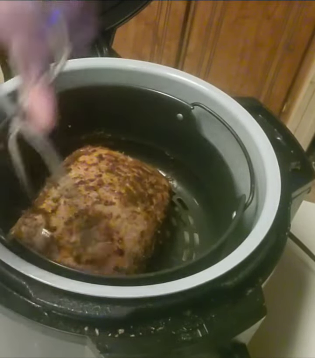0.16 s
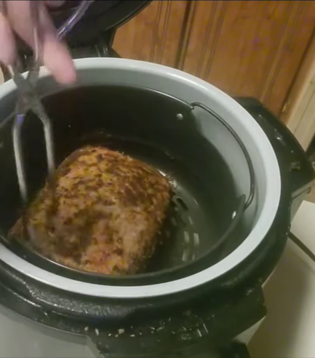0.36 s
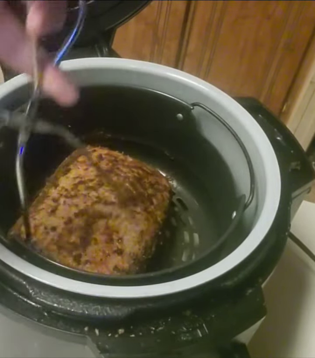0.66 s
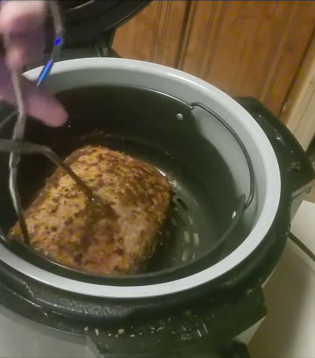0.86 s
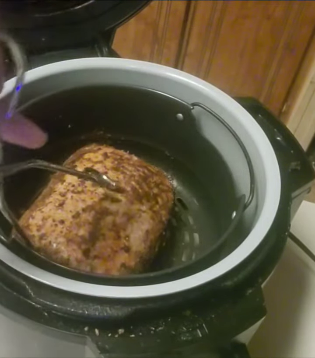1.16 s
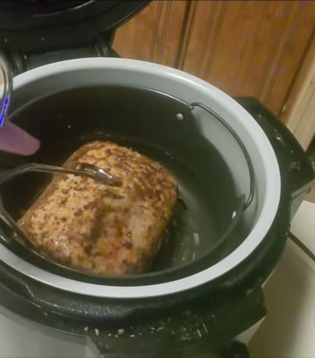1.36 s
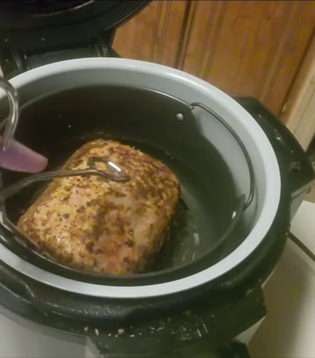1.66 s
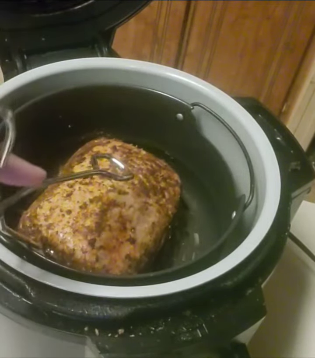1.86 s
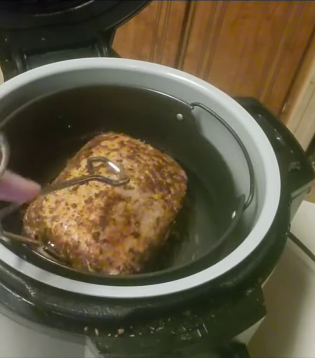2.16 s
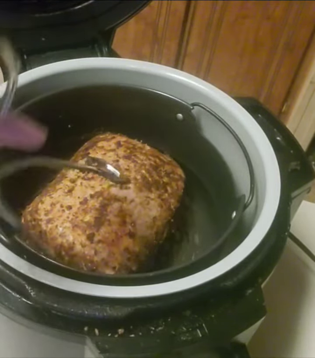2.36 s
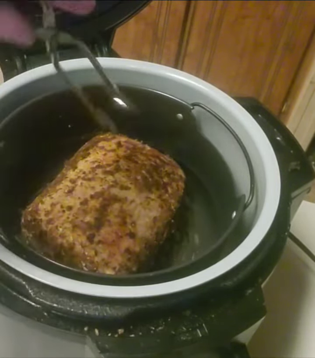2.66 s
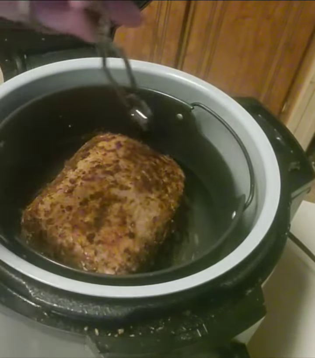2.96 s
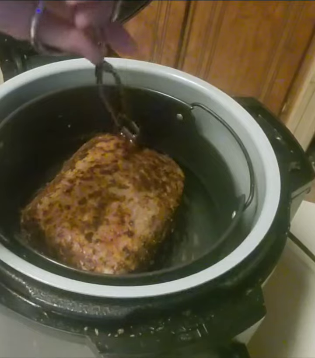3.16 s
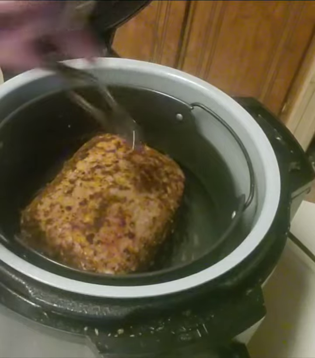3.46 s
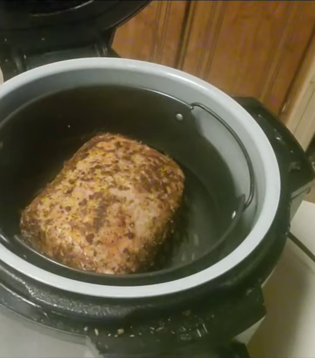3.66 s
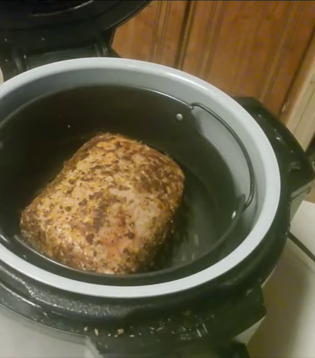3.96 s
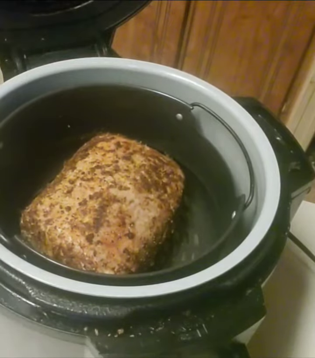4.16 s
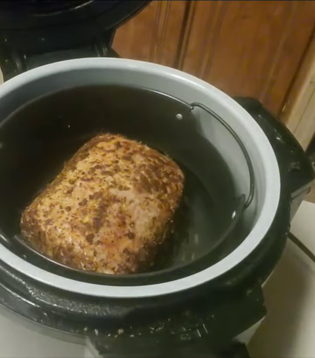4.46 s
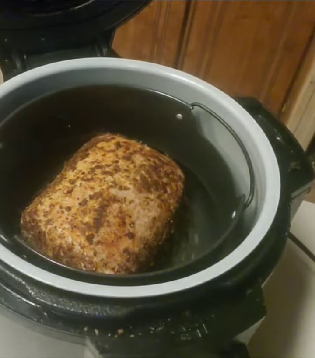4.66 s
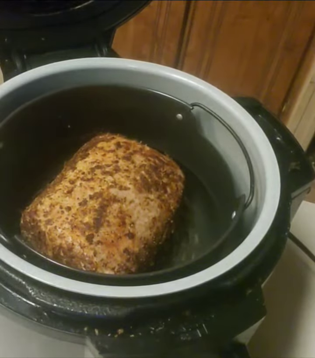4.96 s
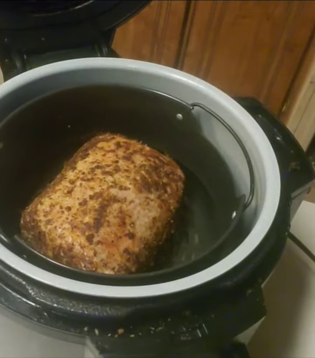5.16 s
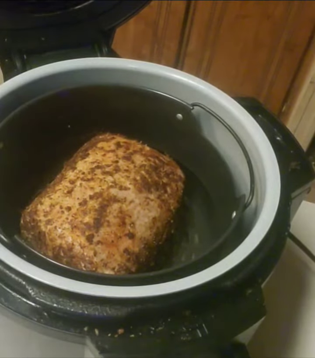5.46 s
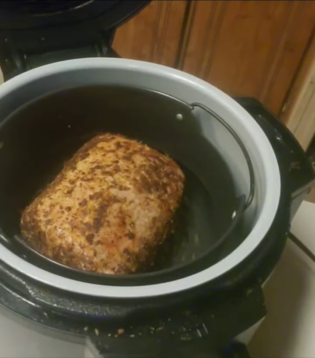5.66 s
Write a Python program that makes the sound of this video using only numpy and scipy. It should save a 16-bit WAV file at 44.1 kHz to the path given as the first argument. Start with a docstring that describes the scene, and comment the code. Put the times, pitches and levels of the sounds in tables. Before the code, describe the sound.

Over a steady fan hum, steel tongs clink against a metal basket, followed by a dull knock and a short, bright clatter.

```python
"""A faint scrape of steel over a humming fan, then bright clinks: tongs turn a roast in the metal
basket of a cooker, in a small kitchen. They clink one arm just after the other, make the basket boom
softly, scrape in trains of tiny slips and rub the moist crust. Later something knocks dully on the
counter and the tongs are put down, bouncing to rest in a short clatter."""
import sys
import numpy as np
from scipy import signal
from scipy.fft import rfft, irfft
from scipy.io import wavfile

SR = 44100
rng = np.random.default_rng(int(sys.argv[2]) if len(sys.argv) > 2 else 0)


def wav_out(sig):
    """Save sig, one row per channel (or a flat mono array), as 16-bit PCM at SR to the path in sys.argv[1]."""
    wavfile.write(sys.argv[1], SR, np.round(np.clip(np.atleast_2d(sig).T, -1, 1) * 32767).astype(np.int16))


N = 256662

# tongs hit the basket: t/s, level/dB, tilt/(dB/oct), arm 1 ping/Hz, arm 2 ping/Hz, ping mix/dB, boom/dB
BASKET_CLINKS = [(.076, -29.5, 1, 8900, 6100, -13, -30), (.508, -11.5, -4.5, 3150, 3830, -9, -18),
                 (.667, 3.5, -0.5, 6170, 3300, -8, -9.5), (.971, -29, -8, 5830, 1950, -11, -48),
                 (1.076, -26.5, -5, 6100, 3320, -11, -37), (1.1951, -14, -8.5, 2070, 3230, 1, -16.5),
                 (1.48, -37.5, -1.5, 1560, 1540, -3, -27), (2.6865, -4, 1.2, 4295, 3550, -5.5, -7),
                 (3.686, -43, 1.5, 14000, 14160, -15.5, -34)]
# tongs slide on the basket: start/s, end/s, level/dB, swell/dB, tilt/(dB/oct)
BASKET_SCRAPES = [(0.013, 0.136, -58, 3.5, -3.5), (.435, .512, -50.5, 24, -5), (0.505, .569, -39, -9, -5.5),
                  (0.569, .67, -52, 21, -5), (.965, 1.11, -61.5, 0, -4), (2.645, 2.691, -46.5, 5.5, -7)]
# crust, tongs and sleeve rub: start/s, end/s, level/dB, tilt/(dB/oct)
SOFT_RUBS = [(1.429, 1.801, -74, 1.5), (2.258, 2.41, -66.5, 3.5), (2.518, 2.65, -69.5, -6),
             (3.95, 4.424, -66.5, -2), (5.481, 5.884, -69.5, -5)]
# dull blows on the counter: t/s, level/dB, tilt/(dB/oct), ping/Hz, ping mix/dB
COUNTER_KNOCKS = [(4.4663, 3, 0, 627, -15), (4.4755, -10, 2.5, 990, -0.5), (4.632, -22.5, 1, 985, -7),
                  (4.862, -19.5, -5.5, 400, -10)]
# tongs touch the counter, then drop: t/s, level/dB, tilt/(dB/oct), arm 1 ping/Hz, arm 2 ping/Hz
TONG_LANDINGS = [(4.8732, -11.5, -3, 4000, 2400), (4.9731, 7, 1.44, 2700, 1775)]

# clear ring of each body (clatter is tongs on counter): f/Hz, level/dB, t60/s
TONG_RING = [(1358, -9, .22), (1556, -12, .18), (2015, -7, .18), (2116, -6, .18), (2387, -4, .2),
             (2780, -4, .16), (2993, -2, .17), (3165, -1, .12), (3330, -1, .16), (3605, 0, .15),
             (3965, -2, .16), (4258, -4, .19), (4366, -7, .14), (4883, -7, .12), (6153, -3, .24),
             (6480, -5, .16), (6560, -7, .16), (6652, -6, .13), (6930, -6, .15), (7555, -6, .16),
             (9017, -9, .12), (9508, -8, .13), (10450, -4, .1), (11480, -10, .15)]
BASKET_RING = [(121, -5, .45), (181, 1, .28), (259, -4, .2), (330, -5, .18), (368, -3, .2), (833, -10, .2),
               (912, -5, .26), (1404, -17, .22)]
COUNTER_RING = [(75, -6, .35), (121, 0, .45), (288, -1, .25), (345, -1, .11), (420, -4, .13), (645, 1, .11),
                (830, -9, .2), (997, 1, .19), (1086, -9, .22), (1309, -7, .17), (1404, -10, .16),
                (1964, -9, .13), (2390, -13, .15), (2750, -15, .15)]
CLATTER_RING = [(79, -4, .5), (118, -4, .45), (303, -10, .25), (425, -6, .25), (522, 2, .33),
                (764, -7, .22), (1023, -5, .33), (1058, -6, .22), (1172, -3, .25), (1273, -5, .22),
                (1646, 1, .25), (1740, 2, .25), (1786, 1, .28), (1830, -3, .22), (1992, -2, .25),
                (2110, -4, .25), (2167, -4, .25), (2531, -4, .22), (2716, -1, .23), (2758, -1, .24),
                (2938, -3, .2), (3052, -2, .23), (3374, -3, .23), (3720, -4, .24), (4198, -7, .23),
                (4775, -10, .23), (5885, -14, .15), (6190, -12, .2), (11322, -18, .24)]
# colour of each body's wash of short-lived modes, and of one rubbing grain: f/Hz, level/dB
TONG_EQ = [(60, -50.5), (200, -24.5), (700, -32.5), (1500, -15), (2600, -10.5), (3250, 3), (4200, -9),
           (5300, -11), (6700, -6), (8400, -11), (10400, -4.5), (12500, -12), (15500, -23)]
COUNTER_EQ = [(25, -32), (110, 0.5), (185, -6.5), (320, 4), (650, -1.5), (800, -1.5), (1000, -2.5),
              (2000, -11), (3200, -20), (5500, -35.5), (9000, -43.5), (16000, -40.5)]
CLATTER_EQ = [(25, -36.5), (70, -5), (190, -13.5), (480, -4.5), (700, -9.5), (1200, -2.5), (1750, -6.5),
              (2800, -1), (4000, -8.5), (5200, -15.5), (6300, -11), (7200, -26.5), (8700, -19),
              (10000, -26.5), (16000, -37)]
RUB_EQ = [(500, -13), (2000, 2.5), (4500, 3.5), (7500, -1), (10000, 0.5), (13000, -6), (16000, -11)]
# decay of each wash, and of the room: f/Hz, t60/s
TONG_DECAY = [(500, 0.054), (3300, 0.036), (7000, 0.04), (12000, .03)]
COUNTER_DECAY = [(100, 0.1), (500, 0.032), (2000, 0.061), (8000, 0.053)]
CLATTER_DECAY = [(100, 0.14), (500, 0.059), (2000, 0.033), (8000, 0.035)]
ROOM_DECAY = [(100, 0.57), (400, 0.17), (1500, 0.3), (4000, 0.3), (12000, 0.21)]

# colour of the fan's rushing air: f/Hz, level/dB
AIR_EQ = [(15, -42.5), (25, -15), (44, -9.5), (113, -5.5), (148, -4), (368, 1), (410, -5.5), (537, -11.5),
          (648, -10.5), (826, -15), (945, -11), (2850, -27.5), (3630, -28.5), (5010, -35), (15500, -44)]
# stereo image of that air: f/Hz, left-right correlation
AIR_CORRELATION = [(60, 0.47), (150, 1), (380, 0.69), (950, -0.23), (2380, 0.072), (5980, -0.1),
                   (15000, -0.22)]
# motor tones: f/Hz, level/dB before the fader
MOTOR_TONES = [(59, -71), (118.4, -66.5), (279.9, -64.5), (554.5, -65.5), (834.4, -67), (1147, -76),
               (1270, -84), (1427, -80.5), (1588, -83)]
# duct resonances: f/Hz, width/Hz, level/dB before the fader
DUCT_PEAKS = [(306, 35, -74), (378, 30, -81), (539, 40, -74.5), (790, 46, -66.5), (2380, 67, -81),
              (3570, 420, -77)]
# fader ride on the whole fan: t/s, level/dB
FAN_FADER = [(0, -3.5), (.45, -4.5), (.8, -0.5), (2.5, 0)]

EDGE_HZ = 15900
CLINK_LAG_S, LANDING_LAG_S = .0031, .0024  # the second arm trails the first


def tongs_in_basket():
    """The tongs clink and scrape; each clink also pushes the loaded basket, which booms softly."""
    struck = lambda: body(TONG_RING, TONG_EQ, TONG_DECAY, ring_db=-6, snap_db=-19)
    pressed = body(TONG_RING, TONG_EQ, TONG_DECAY, ring_db=-12, snap_db=-9.5)
    out = slide(BASKET_SCRAPES, pressed, slips_per_s=3500, uneven_db=2.5, fade=1 / 4)
    for s, *contact, boom_db in BASKET_CLINKS:
        out += strike(both_arms(s, *contact, CLINK_LAG_S), struck, ping_t60=0.055)
        add(out, s + CLINK_LAG_S, amp(boom_db) * ring(BASKET_RING, spread_hz=2400))
    return out * pan(-1.7)


def tongs_put_down():
    """The tongs touch the counter, drop and bounce in a short clatter."""
    landing = lambda: body(CLATTER_RING, CLATTER_EQ, CLATTER_DECAY, ring_db=-8.5, snap_db=-18.5)
    blows = []
    for contact in TONG_LANDINGS:
        blows += both_arms(*contact, ping_db=-5.5, lag_s=LANDING_LAG_S)
    drop_s, drop_db, drop_tilt, *_ = TONG_LANDINGS[-1]
    blows += hops(drop_s, drop_db, drop_tilt)
    return strike(blows, landing, ping_t60=0.024) * pan(-2.1)


def both_arms(s, db, tilt, first_hz, second_hz, ping_db, lag_s):
    """One contact of the tongs is a tight flam: a blow for each arm."""
    return [(s, db, tilt, first_hz, ping_db), (s + lag_s, db, tilt, second_hz, ping_db)]


def hops(s, db, tilt, hop_s=.0186, shrink=0.96, rebound_db=-9.5, loss_db=3.5, dulling=0.93):
    """Five bounces after the drop, each shorter, weaker and duller than the last."""
    blows = []
    for k, pings_hz in enumerate(rng.uniform(1700, 4000, (5, 2))):
        s += hop_s * shrink ** k
        hop_db = db + rebound_db - k * loss_db
        hop_tilt = tilt - (k + 1) * dulling
        blows += both_arms(s, hop_db, hop_tilt, *pings_hz, ping_db=-10.5, lag_s=LANDING_LAG_S)
    return blows


def counter_knocks():
    """Something knocks on the counter, which answers with a dull thud."""
    knock = lambda: body(COUNTER_RING, COUNTER_EQ, COUNTER_DECAY, ring_db=-8.5, snap_db=-7.5)
    return strike(COUNTER_KNOCKS, knock, ping_t60=0.036) * pan(-3)


def rubbing(swell_db=-2):
    """Soft friction on the crust: fine hissy grains with no ring, different left and right."""
    grain = click(RUB_EQ)[None]
    strokes = [(start, end, db, swell_db, tilt) for start, end, db, tilt in SOFT_RUBS]
    return np.array([slide(strokes, grain, slips_per_s=5000, uneven_db=1.8, fade=2 / 3)[side]
                     for side in range(2)])


def strike(blows, make_hit, ping_t60):
    """Each blow sounds the body afresh; the struck spot adds a short ping of its own."""
    out = np.zeros((2, N))
    for s, db, tilt, ping_hz, ping_db in blows:
        ping = amp(ping_db) * ring([(ping_hz, 0, ping_t60)], spread_hz=3400)
        add(out, s, amp(db) * unit(brighten(make_hit(), tilt) + ping))
    return out


def slide(strokes, response, slips_per_s, uneven_db, fade):
    """Friction: a dense train of tiny, uneven slips drives the body through each stroke."""
    out = np.zeros((2, N))
    for start, end, db, swell_db, tilt in strokes:
        sizes = rng.standard_normal(SR) * amp(uneven_db * rng.standard_normal(SR))
        slips = sizes * (rng.random(SR) < slips_per_s / SR)
        n = np.clip(round((end - start) * SR), 64, SR)
        swell = amp(np.linspace(0, swell_db, n))
        drive = unit_rms(slips[:n] * swell) * signal.windows.tukey(n, fade)
        add(out, start, amp(db) * signal.fftconvolve(drive[None], brighten(response, tilt), axes=1))
    return out


def body(modes, eq, decay, ring_db, snap_db):
    """One hit: a snap, a wash of short-lived modes, and the clear ring that outlasts them."""
    wash = unit(mono_bass(dying_noise(decay), below_hz=370))
    wash[:, 0] += amp(snap_db)
    attack = unit(signal.fftconvolve(wash, click(eq)[None], axes=1)[:, :SR // 2])
    return unit(attack + amp(ring_db) * ring(modes))


def ring(modes, spread_hz=1400):
    """Modes ring as dying sines; the higher ones reach left and right out of step."""
    t, out = np.arange(SR // 2) / SR, 0
    for hz, db, t60 in modes:
        phase = rng.uniform(-1, 1, (2, 1)) * min(hz / spread_hz, np.pi)
        rise = 1 - np.exp(-2 * hz * t)  # builds up within about one cycle
        envelope = rise * amp(-60 * t / t60)
        out = out + amp(db) * unit(envelope * np.sin(2 * np.pi * hz * t + phase))
    return unit(out)


def brighten(x, tilt):
    """Harder contact is brighter: a tilt in dB per octave above 500 Hz, at equal energy."""
    octaves = np.log2(EDGE_HZ / 500)
    tilt_filter = click([(500, 0), (EDGE_HZ, tilt * octaves)], size=512)
    tilted = signal.fftconvolve(x, tilt_filter[None], axes=1)[:, :x.shape[1]]
    return tilted * np.linalg.norm(x) / np.linalg.norm(tilted)


def fan(waver_rad=0.96, waver_hz=6):
    """The bed: rushing air, duct resonances and slightly wavering motor tones."""
    hz, t = np.fft.rfftfreq(N, 1 / SR), np.arange(N) / SR
    left, unrelated = rfft(rng.standard_normal((2, N)))
    correlation = np.clip(curve(AIR_CORRELATION, hz), -1, 1)
    right = correlation * left + np.sqrt(1 - correlation ** 2) * unrelated
    air = np.array([left, right])
    out = amp(-53.5) * unit_rms(irfft(air * amp(curve(AIR_EQ, hz)), N))
    for centre, width, db in DUCT_PEAKS:
        detune = 2 * (hz - centre) / width
        out += amp(db) * unit_rms(irfft(air / (1 + detune ** 2), N))
    for tone_hz, db in MOTOR_TONES:
        drift_spectrum = rfft(rng.standard_normal(N)) / (1 + (hz / waver_hz) ** 2)
        drift = waver_rad * unit_rms(irfft(drift_spectrum, N))
        out += amp(db) * np.sqrt(2) * np.sin(2 * np.pi * tone_hz * t + drift)
    fader = amp(np.interp(t, *np.transpose(FAN_FADER)))
    return out * fader * pan(-1.1)


def kitchen(x, onset_s=.003, slap_s=.031, slap_width_s=.0055, slap_lift=1.1):
    """Small-room reverb: dense reflections, with a slap from the walls and ceiling."""
    tail = mono_bass(dying_noise(ROOM_DECAY), below_hz=457)
    t = np.arange(tail.shape[1]) / SR
    fade_in = 1 - np.exp(-(t / onset_s) ** 2)
    slap = 1 + slap_lift * np.exp(-((t - slap_s) / slap_width_s) ** 2)
    # the room is too short for the deepest waves to build a dense tail
    send = signal.sosfilt(signal.butter(2, 170, "highpass", fs=SR, output="sos"), x)
    return signal.fftconvolve(send, unit(tail * fade_in * slap), axes=1)[:, :N]


def dying_noise(decay):
    """Wide stereo noise in which each band dies at its own speed."""
    hz, t, bands = signal.stft(rng.standard_normal((2, SR // 2)), SR, nperseg=64)
    envelopes = amp(-60 * t / curve(decay, hz)[:, None])
    return signal.istft(bands * envelopes, SR, nperseg=64)[1][:, :SR // 2]


def mono_bass(x, below_hz):
    """Long waves reach both sides alike."""
    bass = signal.sosfiltfilt(signal.butter(2, below_hz, fs=SR, output="sos"), x, padtype=None)
    return np.array([x[0], x[1] + bass[0] - bass[1]])


def click(eq, size=4096):
    """The tightest (minimum-phase) click with this EQ curve."""
    hz = abs(np.fft.fftfreq(size, 1 / SR))
    log_gain = np.log(amp(curve(eq, hz)))
    spectrum = np.exp(np.conj(signal.hilbert(log_gain)))
    return unit(np.fft.ifft(spectrum).real[:size // 2])


def curve(points, hz):
    """Reads a table on a log-frequency axis."""
    f, value = np.transpose(points)
    return np.interp(np.log(hz + 1), np.log(f + 1), value)


def amp(db):
    """Decibels to gain."""
    return 10 ** (np.asarray(db) / 20)


def unit_rms(x):
    """Scales to rms 1."""
    return x / np.sqrt(np.mean(x ** 2) + 1e-20)


def unit(x):
    """Scales each channel to energy 1."""
    return x / np.sqrt(np.sum(x ** 2, -1, keepdims=True) + 1e-20)


def pan(db):
    """Channel gains for a left-minus-right level."""
    return amp([[db / 2], [-db / 2]])


def add(mix, s, sound):
    """Mixes a sound in at time s."""
    part = mix[:, max(round(s * SR), 0):][:, :sound.shape[1]]
    part += sound[:, :part.shape[1]]


def scene():
    """Cooker and counter, each with its own reverb send, over the fan."""
    cooker = tongs_in_basket() + rubbing()
    counter = counter_knocks() + tongs_put_down()
    room = kitchen(amp(-9.5) * cooker + amp(-4.5) * counter)
    return cooker + counter + room + fan()


def record(dry):
    """A steep high cut on the whole mix."""
    high_cut = signal.firwin(511, EDGE_HZ, window=("kaiser", 9), fs=SR)
    return signal.oaconvolve(dry, high_cut[None], "same")


dry = scene()
out = record(dry)
wav_out(out)
```